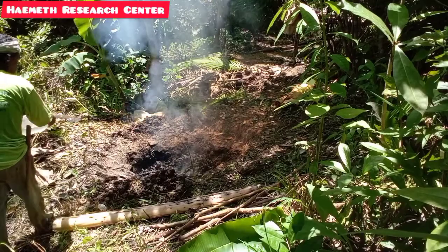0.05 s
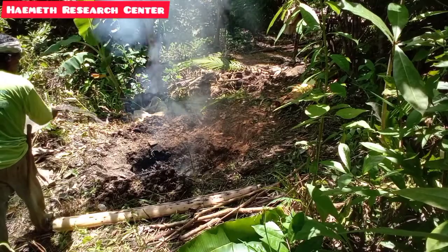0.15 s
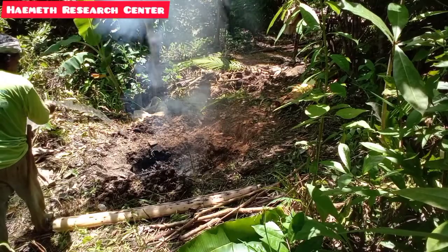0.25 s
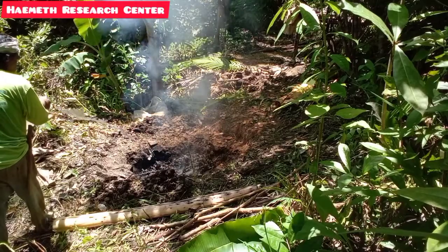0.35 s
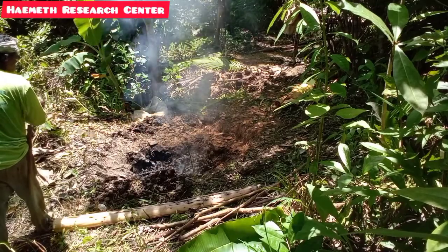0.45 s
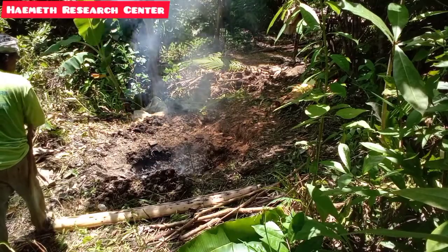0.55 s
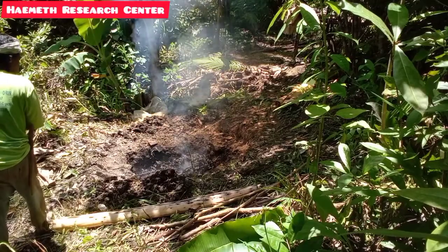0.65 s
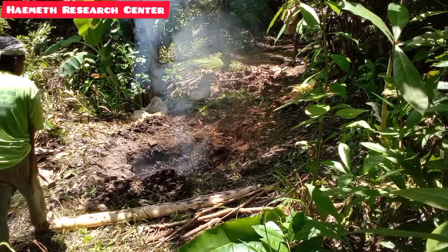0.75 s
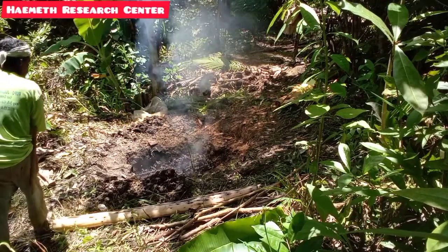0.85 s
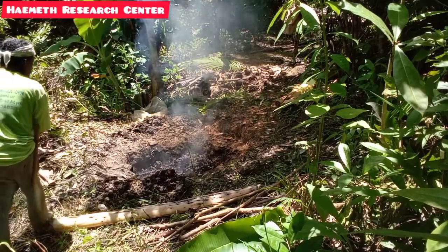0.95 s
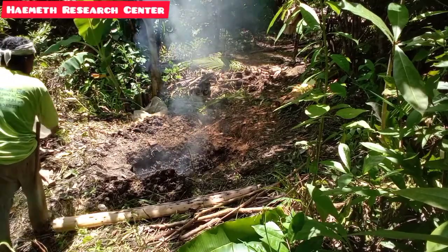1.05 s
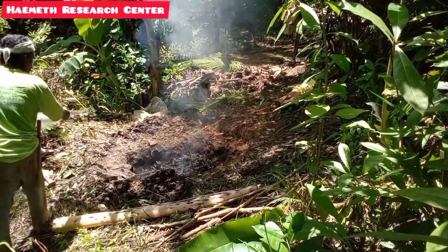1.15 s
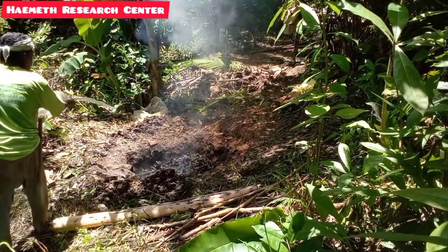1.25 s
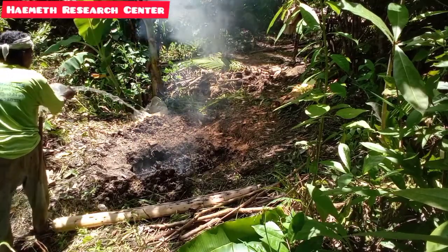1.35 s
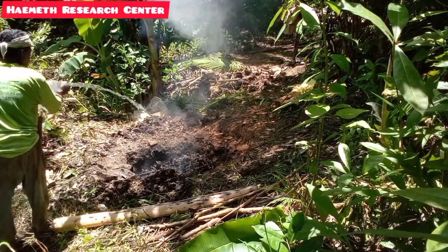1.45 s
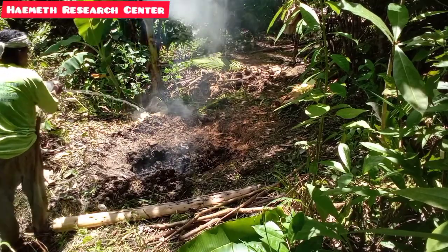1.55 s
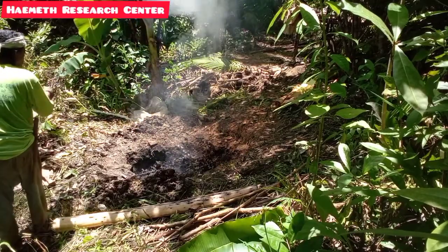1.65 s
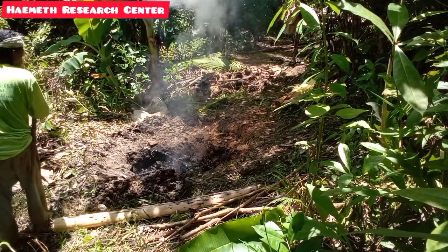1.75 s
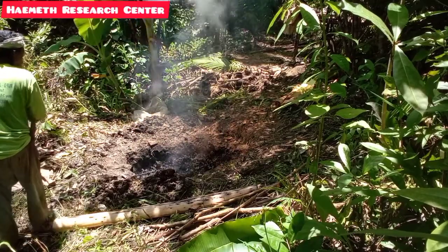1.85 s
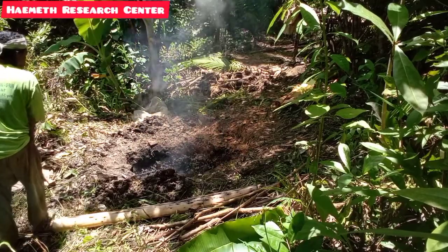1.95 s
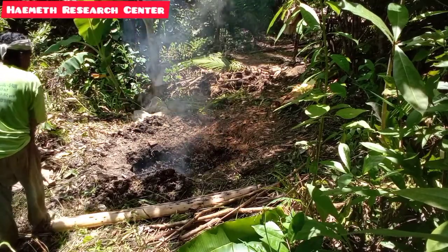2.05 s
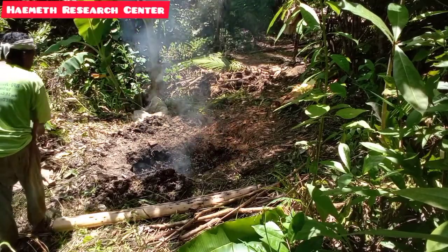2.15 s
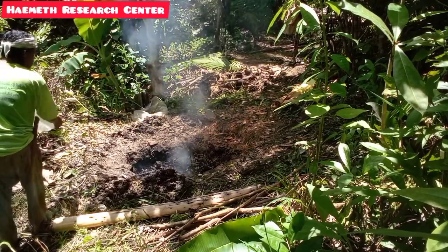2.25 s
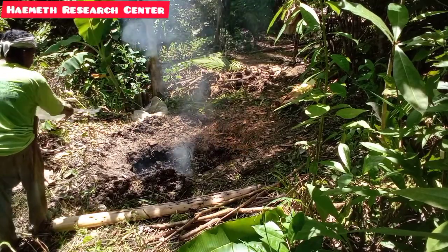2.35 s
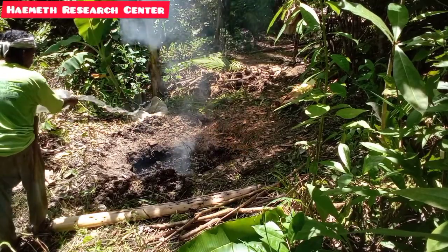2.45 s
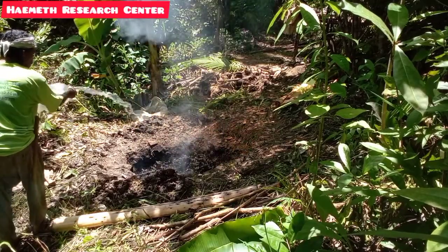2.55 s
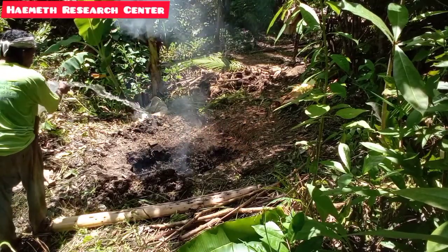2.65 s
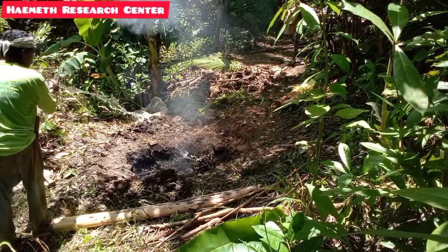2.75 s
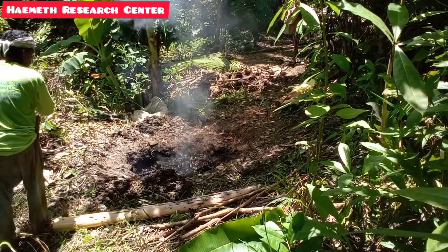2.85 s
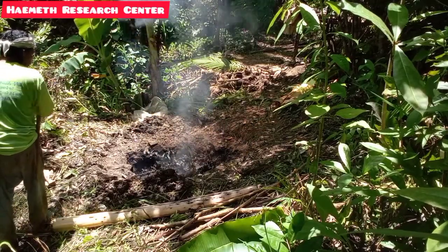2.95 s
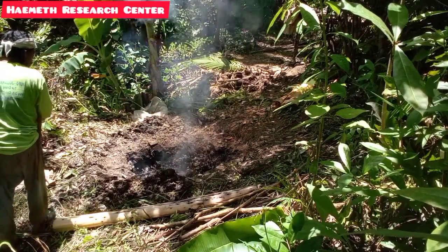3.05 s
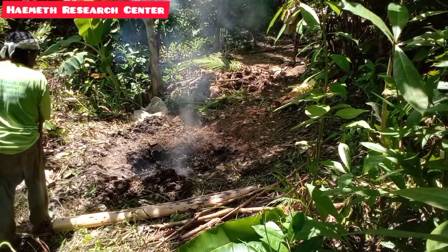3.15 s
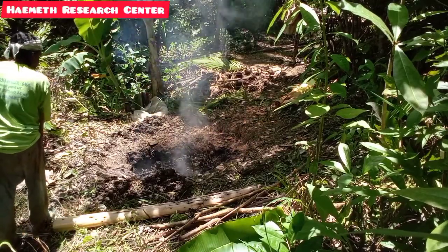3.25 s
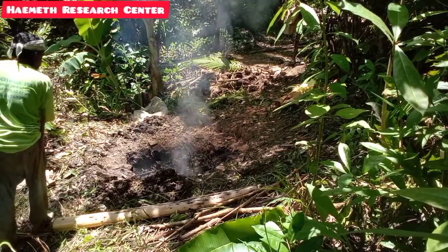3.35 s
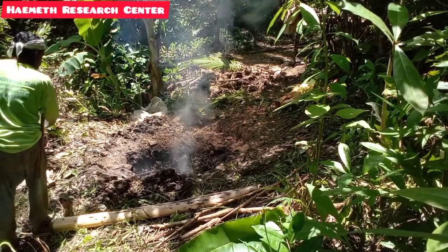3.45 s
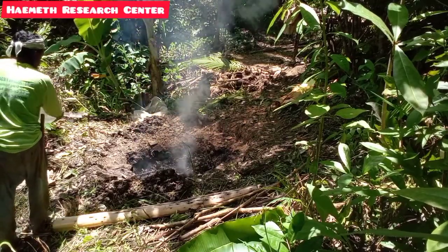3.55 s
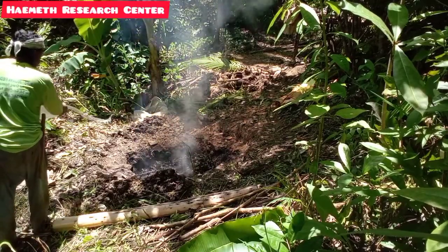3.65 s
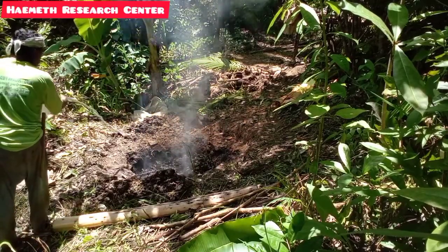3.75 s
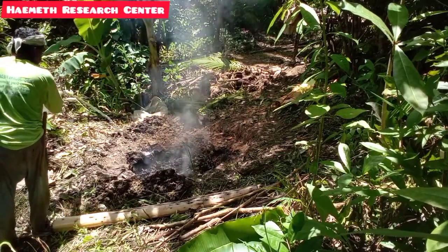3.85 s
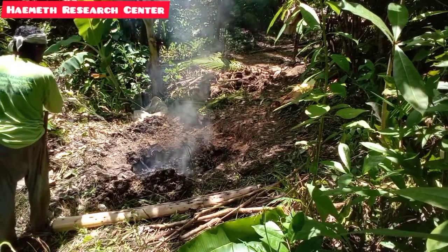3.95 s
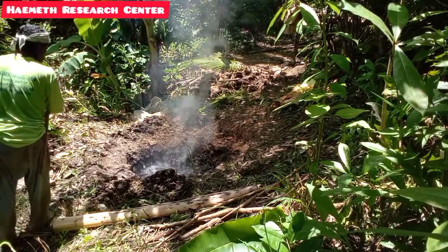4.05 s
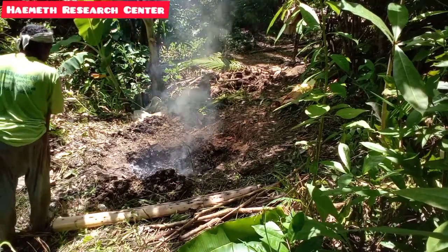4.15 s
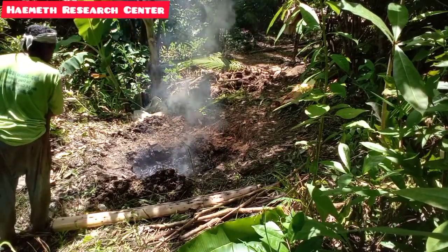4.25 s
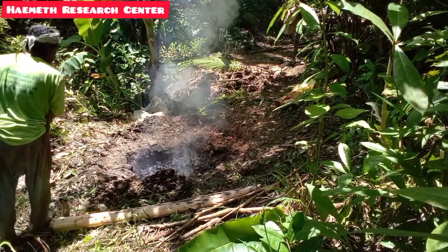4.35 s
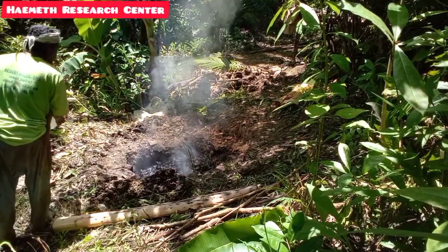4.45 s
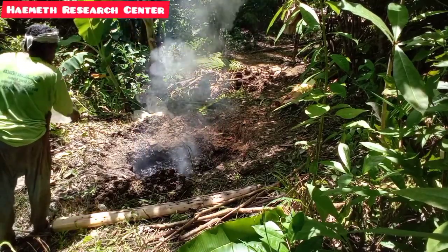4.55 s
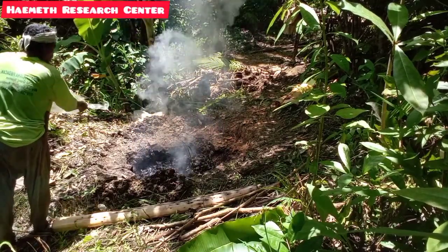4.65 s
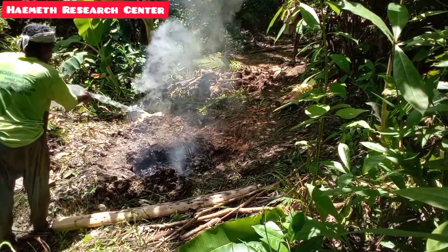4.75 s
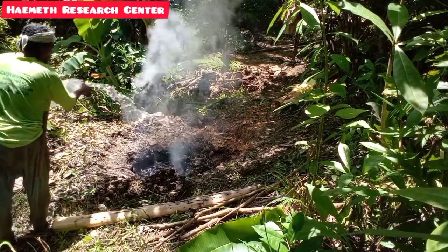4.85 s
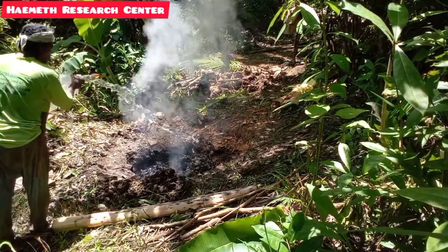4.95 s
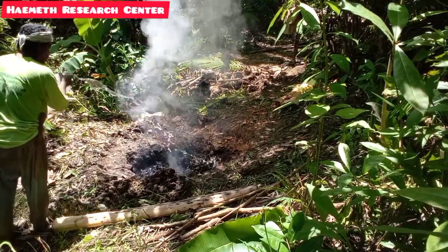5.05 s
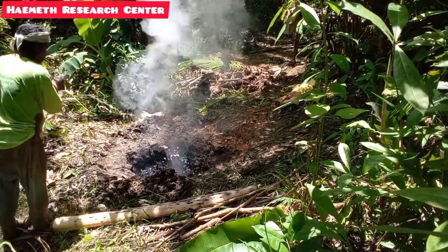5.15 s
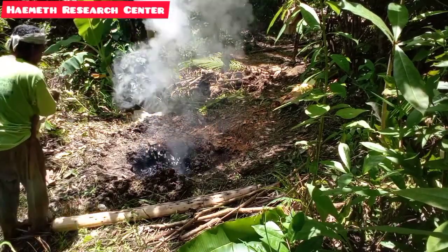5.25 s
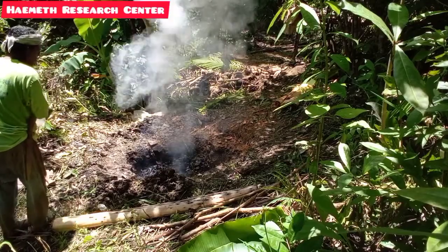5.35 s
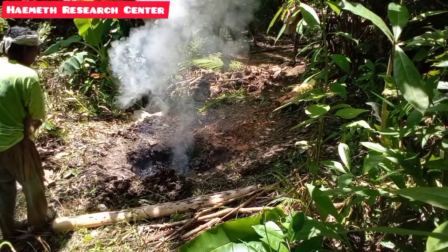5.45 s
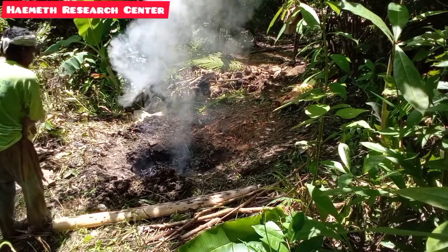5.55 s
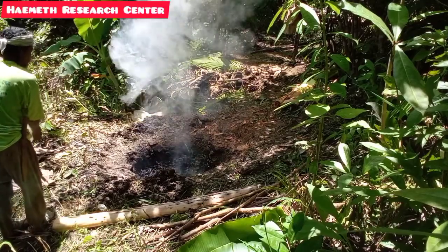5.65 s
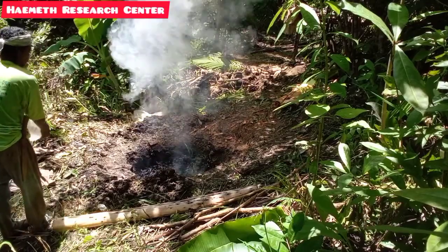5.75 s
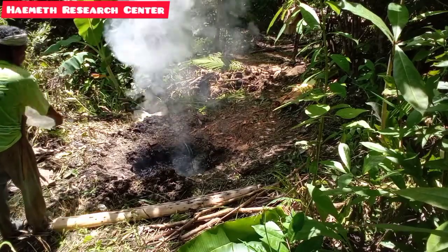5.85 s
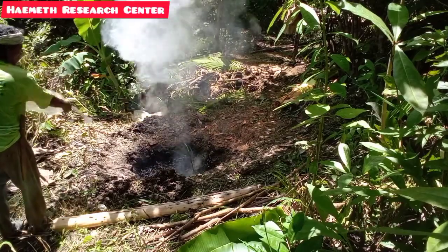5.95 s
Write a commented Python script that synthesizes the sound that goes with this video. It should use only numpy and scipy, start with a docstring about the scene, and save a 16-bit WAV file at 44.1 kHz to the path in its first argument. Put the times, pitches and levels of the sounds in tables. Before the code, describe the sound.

Water is scooped from a bucket and flung onto hot coals five times, each splash sizzling into steam outdoors.

```python
"""Wet charcoal simmers in an earth pit outdoors, over a faint breeze. A scoop plunges into a bucket
with a hollow plunk of trapped air, and the water sloshes and drips. The flung water lands on the coals
as thudding lumps and a patter of spray, then boils off in a surge of hiss. A coal spits, and steam hums
softly through the heap for a few seconds. Scoop and throw come five times, the coals sizzling on
in between, and the scoop dips once more at the very end."""
import sys
import numpy as np
from scipy import signal
from scipy.fft import rfft, irfft
from scipy.io import wavfile
from scipy.ndimage import uniform_filter1d

SR = 44100
rng = np.random.default_rng(int(sys.argv[2]) if len(sys.argv) > 2 else 0)


def master_out(mix):
    """Clip the mix to full scale and print it as 16-bit PCM to the path in sys.argv[1]."""
    frames = np.transpose(np.atleast_2d(mix))
    ceiling = np.clip(frames, -1, 1)
    pcm = np.round(ceiling * 32767).astype(np.int16)
    wavfile.write(sys.argv[1], SR, pcm)


N = 264600
TIME = np.arange(N) / SR


def from_db(db):
    """Decibels to gain."""
    return 10 ** (np.asarray(db) / 20)


def rms_one(x):
    """Scale to unit rms."""
    return x / np.sqrt(np.mean(x ** 2) + 1e-20)


def levels(rows):
    """Gain curves from the dB columns of a table, silent outside it."""
    times, *columns = np.transpose(rows)
    return [from_db(np.interp(TIME, times, db, left=-120, right=-120)) for db in columns]


def add(out, at_s, sound):
    """Mix a short sound in at a given time."""
    start = max(0, round(at_s * SR))
    out[start:start + len(sound)] += sound[:max(0, N - start)]


def colour(x, points):
    """Minimum-phase EQ through the given points, with unit power gain."""
    size = 8192
    hz, db = np.transpose(points)
    grid_hz = np.maximum(np.arange(size // 2 + 1) * SR / size, 1)
    gains = rms_one(from_db(np.interp(np.log(grid_hz), np.log(hz), db)))
    cepstrum = irfft(np.log(gains))
    cepstrum[1:size // 2] *= 2
    cepstrum[size // 2 + 1:] = 0
    return signal.fftconvolve(x, irfft(np.exp(rfft(cepstrum))))[:N]


def band(x, hz, width_hz):
    """One resonance; rms 1."""
    radius, angle = np.exp(-np.pi * width_hz / SR), 2 * np.pi * hz / SR
    return rms_one(signal.lfilter([1, 0, -1], [1, -2 * radius * np.cos(angle), radius ** 2], x))


def drift(rate_hz):
    """Smooth random modulation; rms 1."""
    hop, warm_up = 40, 2000
    pole = np.exp(-2 * np.pi * rate_hz * hop / SR)
    noise = rng.standard_normal(N // hop + warm_up + 2)
    slow = signal.lfilter([1], [1, -2 * pole, pole ** 2], noise)[warm_up:]
    return np.interp(np.arange(N) / hop, np.arange(len(slow)), rms_one(slow))


def grains(per_s, spread_db):
    """Random clicks of uneven size and sign; rms 1."""
    sizes = from_db(spread_db * np.minimum(rng.exponential(1, N), 4))
    return rms_one((rng.random(N) < per_s / SR) * sizes * rng.choice([-1, 1], N))


def fade(t60):
    """An exponential decay, a quarter of a second long."""
    return np.exp(-np.log(1000) * TIME[:SR // 4] / t60)


def ring(hz, t60):
    """A struck mode: one decaying sine."""
    decay = fade(t60)
    return decay * np.sin(2 * np.pi * hz * TIME[:len(decay)])


def soften(sound, swell_s):
    """Round off the attack of a short sound."""
    return sound * (1 - np.exp(-TIME[:len(sound)] / swell_s))


def saturate(gain, ceiling_db):
    """A level that rises freely at first and then flattens out."""
    return from_db(ceiling_db) * np.tanh(gain / from_db(ceiling_db))


# Soft rumble of moving air: freq_hz, gain_db
BREEZE_EQ = [(25, -37), (55, -7.5), (100, 1.5), (170, -3), (280, -3.5), (450, -4), (750, -23.5),
             (1400, -9.5), (4000, -35.5)]

def breeze(level_db=-55, waver_db=0.3):
    """A faint, almost steady bed of outdoor air."""
    return from_db(level_db + waver_db * drift(rate_hz=2.2)) * colour(rng.standard_normal(N), BREEZE_EQ)


# Wet coals simmering between throws: time_s, hiss_db, fizz_db
SIMMER = [(0, -39.5, -47.5), (0.28, -48, -53), (1.1, -48.5, -55), (1.3, -45, -52), (2.4, -45.5, -52),
          (2.72, -49, -55), (3.88, -47.5, -54.5), (4.2, -43.5, -47.5), (4.8, -42, -50.5), (5.4, -48, -54),
          (5.82, -50.5, -58.5), (6, -49, -55)]

def steam(flash_hiss_db=-12, flash_fizz_db=-17):
    """Hiss and fizz envelopes: the simmer, fresh water boiling off and steam flashes add in power."""
    _, _, hiss_flow, fizz_flow = flows()
    hiss_simmer, fizz_simmer = levels(SIMMER)
    flashes = aftermath(t60=0.19, swell_s=0.0098)   # part of each big lump turns to steam at once
    hiss = [hiss_simmer, boil(hiss_flow, lasts_s=0.052), from_db(flash_hiss_db) * flashes]
    fizz = [fizz_simmer, boil(fizz_flow, lasts_s=0.14), from_db(flash_fizz_db) * flashes]
    return np.linalg.norm(hiss, axis=0), np.linalg.norm(fizz, axis=0)


# The steam's midrange hiss and airy fizz, coloured by the microphone's peak at 8.3 kHz
# and dip at 6.3 kHz: freq_hz, gain_db
HISS_EQ = [(80, -32), (400, -12.5), (850, -14), (1250, -3), (1650, -1.5), (1950, -5.5), (2400, 1.5),
           (3000, 0.5), (3500, -1.5), (4000, -1.5), (4900, -10.5), (6200, -18), (9000, -45)]
FIZZ_AND_MIC_EQ = [(4000, -9), (6300, -13.5), (7100, -8), (7700, -7), (8300, 0), (8700, -4.5), (9200, -6),
                   (9800, -12), (11000, -14.5), (12400, -16), (13500, -14), (14400, -16), (15500, -10.5)]

def sizzle(hiss_db=-1.44, fizz_db=2.5, jets_db=-9.5):
    """Thousands of tiny steam bursts a second merge into a sputtering hiss."""
    hiss_level, fizz_level = steam()
    hiss_level = saturate(hiss_level, ceiling_db=-31)   # the coals can boil only so much
    surge = drift(rate_hz=10)   # both layers surge together, and each also sputters on its own
    hiss_level *= from_db(hiss_db + 0.172 * surge + 1.082 * drift(rate_hz=8.4))
    fizz_level *= from_db(fizz_db + 0.205 * surge + 0.66 * drift(rate_hz=33))
    hiss = colour(hiss_level * grains(per_s=12000, spread_db=2.0), HISS_EQ)
    fizz = colour(fizz_level * grains(per_s=16000, spread_db=2.5), FIZZ_AND_MIC_EQ)
    return hiss + fizz + from_db(jets_db) * hiss_level * jets()


def jets(count=70, length_s=0.16, width_hz=70, low_hz=2250, high_hz=4200):
    """Steam squeezes through pores in the charcoal: brief, rough whistles at random pitches; rms 1."""
    out, swell = np.zeros(N), np.hanning(int(length_s * SR))
    for when, height in rng.random((count, 2)):
        hz = low_hz * (high_hz / low_hz) ** height
        whistle = band(rng.standard_normal(SR // 2), hz, width_hz)[:len(swell)]
        add(out, when * N / SR, low_hz / hz * swell * whistle)
    return rms_one(out)


# Plunges into the bucket:
# start_s, pocket_db, rim_db, pitch_ratio, tick_db, tick_lead_s, slosh_db, slosh_t60_s
SCOOPS = [(0.086, -21.5, -28.5, 0.96, -37, 0.001, -52, 5.9),
          (1.228, -17.5, -27, 0.99, -30.5, 0.0092, -47.5, 2.4),
          (2.48, -22, -29, 0.93, -38, 0.00077, -52.5, 11),
          (3.617, -23, -32.5, 1.09, -41, 0.003, -52.5, 1.6),
          (4.7592, -22, -27, 0.944, -35, 0.002, -44, 0.38),
          (5.939, -29.5, -27, 1.0, -37, 0.0011, -48, 0.41)]
# Ring of the trapped air and of the scoop's wall: pitch_hz, level_db, t60_s
POCKET_MODES = [(391.6, 4, 0.034), (421, 4, 0.025)]
RIM_MODES = [(906, -12.5, 0.19), (1070, 7, 0.015), (1215, -6, 0.07)]
# Bright tone of fine droplets, in the bucket and on the coals: freq_hz, gain_db
SPRAY_EQ = [(100, -66), (400, -0.5), (750, 0), (1250, 6.5), (1600, 4.5), (1950, 1), (2400, 5.5),
            (3100, 1.5), (4200, -4.5), (6200, -20), (8300, -18), (11000, -32), (15000, -52)]

def scoops(pocket_trim_db=-2, rim_trim_db=-3):
    """The scoop breaks the surface with a tick, knocks on the water and traps air that rings low."""
    plunks, ticks = np.zeros(N), np.zeros(N)
    for start_s, pocket_db, rim_db, ratio, tick_db, tick_lead_s, _, _ in SCOOPS:
        pocket = sum(from_db(db) * ring(hz * ratio, t60) for hz, db, t60 in POCKET_MODES)
        rim = sum(from_db(db) * ring(hz * ratio, t60) for hz, db, t60 in RIM_MODES)
        add(plunks, start_s, from_db(pocket_db + pocket_trim_db) * soften(pocket, swell_s=0.0026))
        add(plunks, start_s, -from_db(rim_db + rim_trim_db) * rim)
        add(ticks, start_s - tick_lead_s, from_db(tick_db) * soften(fade(t60=0.077), swell_s=0.0019))
    return plunks + colour(ticks * grains(per_s=6000, spread_db=2.0), SPRAY_EQ)


# Hollow tone of water moving in the bucket: freq_hz, gain_db
SLOSH_EQ = [(50, -51), (170, -3), (420, 0.5), (680, -8.5), (950, -3.5), (1200, -10), (2000, -16),
            (5000, -37)]

def slosh(trim_db=-1, churn_db=-44, churn_t60=0.32):
    """Each scoop churns the water briefly; then it laps in the bucket as it settles."""
    stirred = np.zeros(N)
    for start_s, *_, lap_db, lap_t60 in SCOOPS:
        age_s = np.maximum(TIME - start_s, 0)
        lapping = from_db(lap_db - 60 * age_s / lap_t60)
        churning = from_db(churn_db - 60 * age_s / churn_t60)
        stirred += (TIME > start_s) * np.hypot(lapping, churning)
    return from_db(trim_db) * colour(stirred * grains(per_s=600, spread_db=2.5), SLOSH_EQ)


def foliage(x, t60, wet_db, band_hz=(200, 2500), predelay_s=0.005):
    """Ground, trunks and leaves add a short scatter of dull echoes to the dry sound."""
    decay = fade(t60)
    echoes = decay * grains(per_s=900, spread_db=0.5)[:len(decay)] * (TIME[:len(decay)] > predelay_s)
    dulling = signal.butter(1, band_hz, "band", fs=SR, output="sos")
    echoes = signal.sosfilt(dulling, echoes / np.linalg.norm(echoes))
    return x + from_db(wet_db) * signal.fftconvolve(x, echoes)[:N]


# Single drips and gurgles from scoop and bucket: start_s, level_db, pitch_hz
DRIPS = [(0.179, -39, 188), (1.433, -33, 1480), (2.787, -31, 770), (2.789, -26.5, 440), (4.689, -34, 916),
         (5.047, -27.5, 860), (5.634, -34, 1360), (5.941, -24.5, 2030)]

def drips(cycles=16):
    """Each drip traps one short-lived bubble; big, low bubbles ring longer."""
    out = np.zeros(N)
    for start_s, level_db, hz in DRIPS:
        add(out, start_s, from_db(level_db) * ring(hz, t60=cycles / hz))
    return out


# The biggest lumps of water landing: start_s, thud_db, pitch_hz, thud_t60_s, spray_db
SLAPS = [(0.414, -25.5, 84, .035, -52), (0.527, -19.5, 109, .03, -31), (0.551, -22, 94, 0.051, -57),
         (0.678, -22, 270, 0.013, -30), (1.686, -16, 223, .022, -26.5), (1.751, -11.5, 390, 0.014, -28),
         (1.774, -9.5, 250, 0.039, -29), (1.794, -11.5, 1380, 0.0078, -24.5), (1.832, -8.5, 99, 0.021, -28),
         (1.885, -16, 110, 0.042, -27), (1.908, -21, 150, .02, -31), (1.935, -2.5, 310, 0.014, -27.5),
         (1.937, -8, 543, 0.017, -26), (1.965, -16, 97, 0.1, -33), (1.996, -13.5, 330, 0.015, -34),
         (2.854, -26, 300, .01, -21.5), (2.868, -6, 220, 0.013, -16.5), (2.876, -8.5, 408, 0.0099, -16.5),
         (2.881, -8.5, 207, 0.015, -14), (2.891, -6, 280, 0.016, -22), (2.904, -10, 377, 0.032, -17),
         (2.912, -7.5, 128, 0.016, -41), (2.972, -20, 133, 0.027, -39), (3.091, -13, 79.6, .068, -32),
         (3.118, -16, 495, .026, -21), (3.127, -16.5, 108, 0.04, -22.5), (3.985, -27, 453, 0.043, -30),
         (4.001, -22, 270, .024, -33), (5.103, -22, 113, 0.035, -46), (5.1728, -14.5, 315, 0.021, -22),
         (5.179, -13, 350, 0.032, -20), (5.267, -17.5, 357, 0.0053, -26.5), (5.357, -19, 102, 0.053, -35),
         (5.438, -22, 98, 0.12, -40)]

def slaps(scatter_db=-9, thud_trim_db=1, droplets_db=-4, tinkle_db=-11):
    """A big lump stops dead on the earth with a damped thud, bursts and scatters tinkling droplets."""
    thuds, bursts = np.zeros(N), np.zeros(N)
    crack_and_scatter = fade(t60=0.01) + from_db(scatter_db) * fade(t60=0.16)
    for start_s, thud_db, hz, t60, spray_db in SLAPS:
        add(thuds, start_s, from_db(thud_db) * ring(hz, t60))
        add(bursts, start_s, from_db(spray_db) * crack_and_scatter)
    droplets = colour(bursts * grains(per_s=8000, spread_db=2.0), SPRAY_EQ)
    tinkle = uniform_filter1d(bursts, size=64) * bubbles(2400, cycles=110, low_hz=1120, high_hz=3260)
    return from_db(thud_trim_db) * thuds + from_db(droplets_db) * droplets + from_db(tinkle_db) * tinkle


def bubbles(count, cycles, low_hz, high_hz, spread_db=2.5, tilt=1):
    """Pockets of trapped air ring briefly, each at its own pitch, the small high ones weaker; rms 1."""
    out = np.zeros(N)
    for when, height, strength in rng.random((count, 3)):
        hz = low_hz * (high_hz / low_hz) ** height
        t = TIME[:int(SR * cycles / hz) + 2]
        tone = from_db(-60 * t * hz / cycles) * np.sin(2 * np.pi * hz * t)
        gain = from_db(spread_db * (2 * strength - 1)) * (low_hz / hz) ** tilt
        add(out, when * N / SR, gain * tone)
    bandpass = signal.butter(4, [0.894 * low_hz, 1.155 * high_hz], "band", fs=SR, output="sos")
    return rms_one(signal.sosfilt(bandpass, out))


def aftermath(t60, swell_s):
    """Envelope of what each big lump sets off: a quick swell and a decay, as strong as its spray."""
    power = np.zeros(N)
    for start_s, *_, spray_db in SLAPS:
        add(power, start_s, (from_db(spray_db) * soften(fade(t60), swell_s)) ** 2)
    return np.sqrt(power)


# Throws landing on the coals:
# start_s, length_s, attack_s, thinning_db_per_s, drum_db, plop_db, hiss_db, fizz_db
THROWS = [(0.51, 0.2, 0.027, -4, -36.5, -40.5, -42.5, -46),
          (1.684, 0.31, 0.02, 7.5, -28.5, -31.5, -37, -42), (2.858, 0.34, 0.1, 15, -29, -38.5, -35.5, -41),
          (3.987, 0.402, 0.03, 44, -28, -33, -43.5, -46.5), (5.099, 0.43, 0.042, 5.5, -36, -40, -44.5, -50)]

def flows(run_out_db_per_s=347):
    """Drum, plop, hiss and fizz envelopes: each throw swells, thins or builds a little, and runs out."""
    envelopes = np.zeros((4, N))
    for start_s, length_s, attack_s, thinning_db_per_s, *layers_db in THROWS:
        age_s = TIME - start_s
        swell_db = 20 * np.minimum(age_s, 0) / attack_s
        thinning_db = thinning_db_per_s * np.clip(age_s, 0, length_s)
        run_out_db = run_out_db_per_s * np.maximum(age_s - length_s, 0)
        flow = from_db(np.maximum(swell_db - thinning_db - run_out_db, -120))
        envelopes += from_db(layers_db)[:, None] * flow
    return envelopes


# Dull body of small lumps drumming down: freq_hz, gain_db
DRUM_EQ = [(25, -10), (50, -5), (80, 6.5), (115, 0.5), (165, -6), (240, -1.5), (450, -13.5), (590, -20.5),
           (720, -29.5), (1500, -25), (4000, -62)]

def shower(drum_db=-2, plop_db=-2, patter_db=-11, clump_db=1.3, rebound_db=-3):
    """The rest of each throw rains down in clumps: small lumps drum and plop, finer drops patter."""
    lumps, puddles, _, _ = flows() * from_db(clump_db * drift(rate_hz=23.5))
    rebound = from_db(rebound_db) * aftermath(t60=0.18, swell_s=0.005)   # splashed-up water falls back
    puddles = saturate(np.hypot(puddles, rebound), ceiling_db=-29)
    drum = colour(lumps * grains(per_s=450, spread_db=1.5), DRUM_EQ)
    plops = puddles * bubbles(1500, cycles=11.3, low_hz=225, high_hz=612, tilt=0.4)
    patter = colour(puddles * grains(per_s=700, spread_db=3.5), SPRAY_EQ)
    return from_db(drum_db) * drum + from_db(plop_db) * plops + from_db(patter_db) * patter


def boil(flow, lasts_s):
    """Water gathers on the coals while it falls and boils away exponentially."""
    pole = np.exp(-1 / (lasts_s * SR))
    return np.sqrt(signal.lfilter([1 - pole], [1, -pole], flow ** 2))


# Coals spitting as they crack: start_s, level_db, centre_hz
SPITS = [(0.739, -34, 4200), (1.865, -33.5, 2800), (3.004, -23.5, 4020), (4.305, -36, 8300),
         (5.480, -30, 2360)]

def spits(t60=0.016, width_hz=1800):
    """A quenched coal splits and lets out a short, bright puff."""
    out, decay = np.zeros(N), fade(t60)
    for start_s, level_db, hz in SPITS:
        puff = band(band(rng.standard_normal(len(decay)), hz, width_hz), hz, width_hz)
        add(out, start_s, from_db(level_db) * decay * puff)
    return out


# Rise and fall of the hollow steam hum: time_s, level_db
VENT_LEVEL = [(1.2, -56), (2.1, -52.5), (2.7, -59.5), (3.2, -53.5), (3.55, -57.5), (4.2, -77)]
# Resonant gaps in the wet heap: centre_hz, width_hz, level_db
VENT_MODES = [(818, 37, -2.5), (973, 93, -3), (550, 220, -1.5)]

def vent(trim_db=3):
    """Steam blowing through gaps between the coals sounds three soft, low resonances."""
    hum = np.zeros(N)
    for hz, width_hz, level_db in VENT_MODES:
        breath = band(rng.standard_normal(N), hz, width_hz)
        hum += from_db(level_db) * band(breath, hz, 2 * width_hz)
    return from_db(trim_db) * levels(VENT_LEVEL)[0] * rms_one(hum)


def scene():
    """Bucket, splashes and steam over a faint breeze, in mono."""
    air = breeze()
    bucket = foliage(scoops() + slosh() + drips(), t60=0.16, wet_db=-6.5)
    splashes = foliage(slaps() + shower(), t60=0.14, wet_db=-14.5)
    return (air + sizzle() + bucket + splashes + spits() + vent())[None, :]


def record(dry, low_cut_hz=56, high_cut_hz=15550):
    """The microphone drops the deep bass; the very top is cut steeply."""
    low_cut = signal.butter(4, low_cut_hz, "high", fs=SR, output="sos")
    high_cut = signal.ellip(16, 0.1, 80, high_cut_hz, fs=SR, output="sos")
    return signal.sosfilt(high_cut, signal.sosfilt(low_cut, dry))


dry = scene()
out = record(dry)
master_out(out)
```